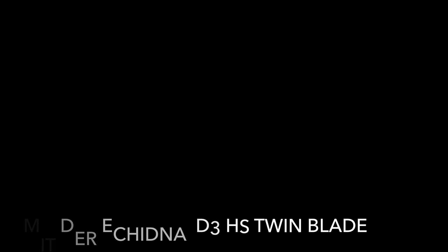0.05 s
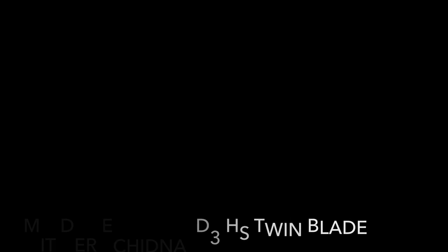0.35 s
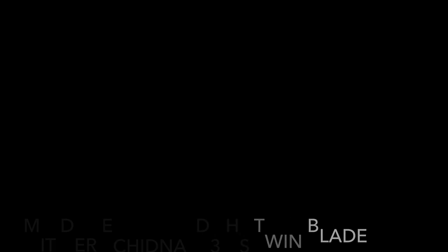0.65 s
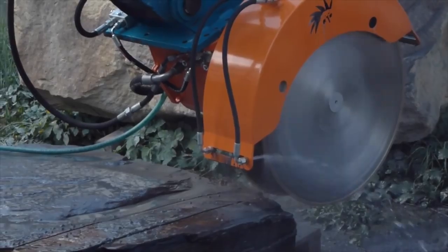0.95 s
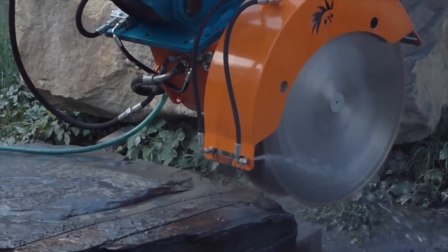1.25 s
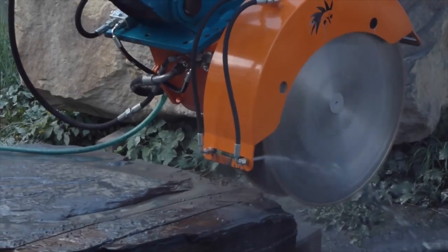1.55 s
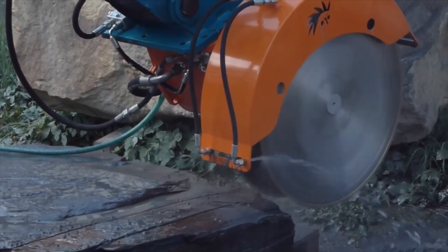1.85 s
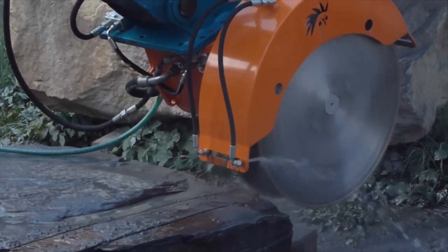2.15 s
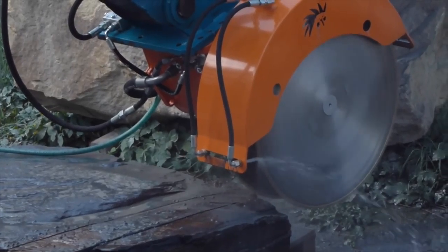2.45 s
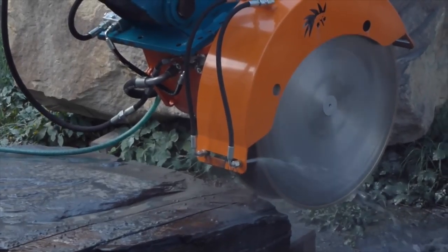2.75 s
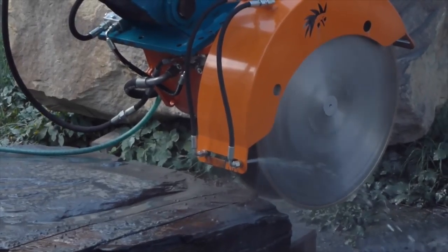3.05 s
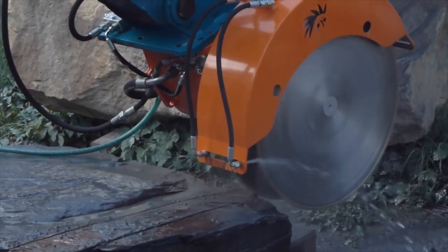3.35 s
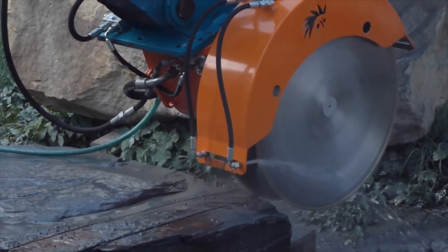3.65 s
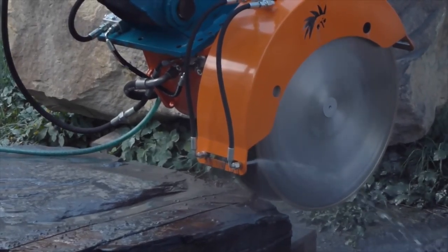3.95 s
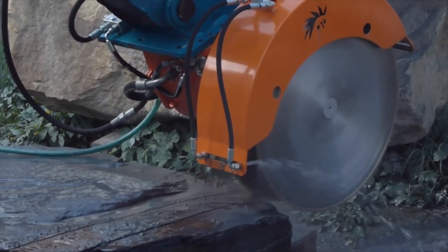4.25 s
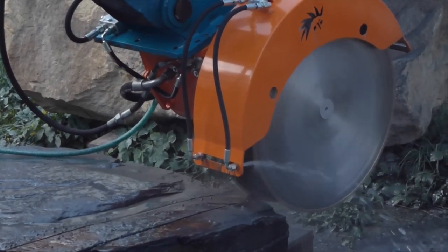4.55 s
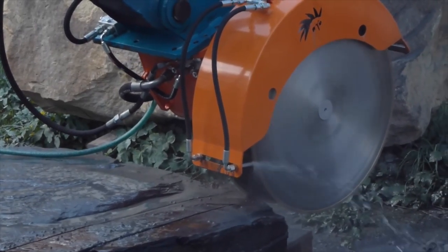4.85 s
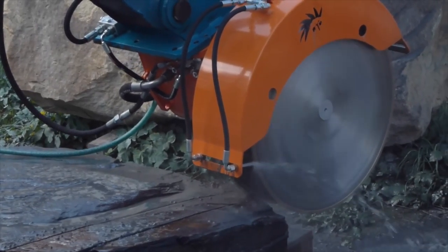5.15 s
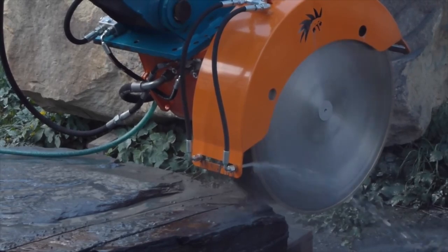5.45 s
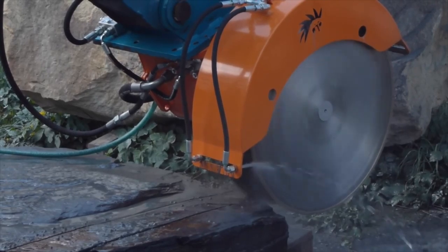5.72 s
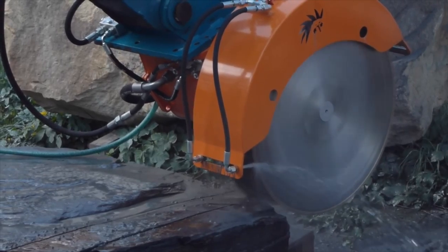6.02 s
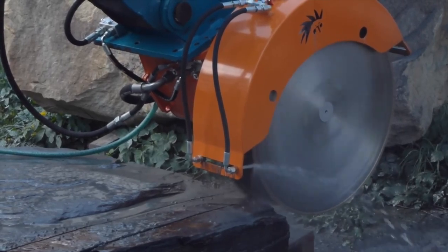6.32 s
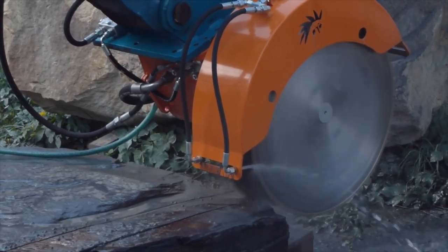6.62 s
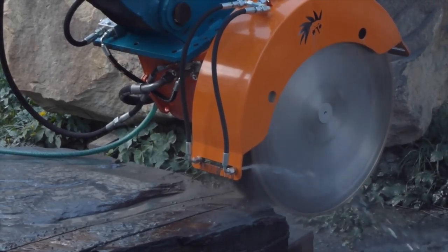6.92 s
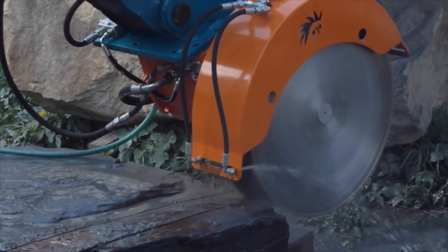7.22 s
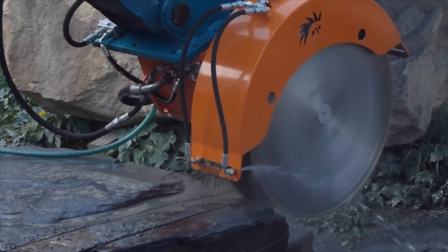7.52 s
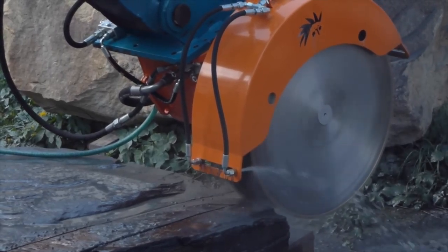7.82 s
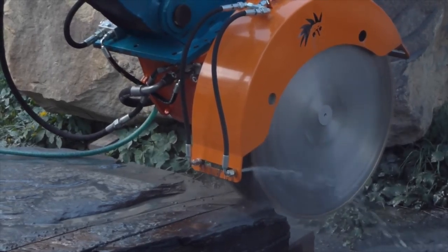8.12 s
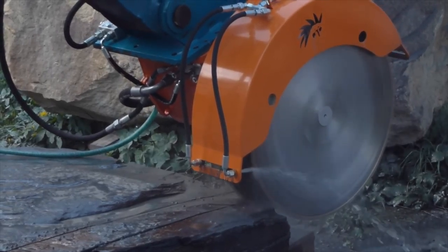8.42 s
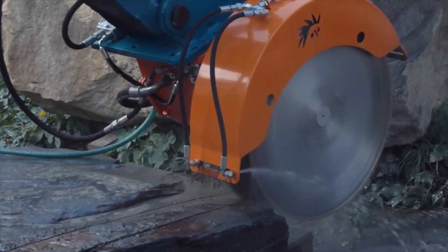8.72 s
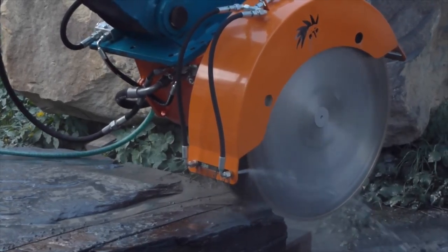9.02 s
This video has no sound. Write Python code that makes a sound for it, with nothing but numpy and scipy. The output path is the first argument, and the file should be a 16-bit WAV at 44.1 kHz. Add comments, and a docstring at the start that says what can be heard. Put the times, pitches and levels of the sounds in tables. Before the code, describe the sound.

A rock saw grinds into stone, its steel blade rasping, ringing and squealing over a droning diesel engine and hissing water spray.

```python
"""Rock saw biting into stone

A hydraulic saw on an excavator fades in, outdoors. Its big steel blade sinks into a slab: grit rasps
and sets the disc ringing, a little harder once a turn, and the kerf walls make it squeal and chatter.
Behind it the diesel, pump and fan drone at a steady speed. Cooling water sprays off the rim, and a
breeze brushes the microphone."""
import sys
import numpy as np
from scipy import signal
from scipy.fft import rfft, irfft
from scipy.io import wavfile
from scipy.ndimage import uniform_filter1d

SR = 44100
rng = np.random.default_rng(int(sys.argv[2]) if len(sys.argv) > 2 else 0)


def master_out(mix):
    """Clip the mix to full scale and print it as 16-bit PCM to the path in sys.argv[1]."""
    frames = np.transpose(np.atleast_2d(mix))
    ceiling = np.clip(frames, -1, 1)
    pcm = np.round(ceiling * 32767).astype(np.int16)
    wavfile.write(sys.argv[1], SR, pcm)


N = 409248
T = np.arange(N) / SR
FREQS = np.arange(N // 2 + 1) * SR / N
SEATED_S, FULL_DEPTH_S = 3.126, 6.5  # the blade seats in the stone, then reaches full depth

# The steel disc's strongest modes. Each row: pitch in Hz, width in Hz, base level in dB.
BLADE_MODES = [ (953, 16, -52.5), (1184, 36, -47), (1442, 6, -53.5), (1540, 20, -54), (1708, 12, -51.5),
               (1986, 6, -49.5), (2056, 10, -55), (2266, 5, -52.5), (2305, 16, -53.5), (2540, 6, -49.5),
               (2628, 16, -54), (2783, 8, -48), (2955, 9, -53), (3105, 14, -54), (3321, 18, -45),
               (3461, 14, -51.5), (3577, 18, -48), (3710, 12, -53), (3773, 14, -50.5), (3850, 10, -52.5),
               (3940, 16, -53), (4005, 11, -50.5), (4100, 36, -45), (4365, 18, -53), (4535, 22, -49),
               (4680, 12, -47.5), (4855, 12, -48.5), (5038, 50, -52), (5180, 16, -55), (5495, 20, -54),
               (5615, 16, -56), (5690, 20, -56), (5950, 70, -53), (6730, 30, -56), (7060, 60, -54),
               (7184, 8, -54), (7816, 20, -57.5), (7961, 40, -57.5), (8060, 30, -58), (9159, 12, -58.5),
               (9366, 25, -60), (9786, 13, -57.5), (9969, 20, -59), (12720, 140, -60), (13870, 130, -60)]


def saw(load_db, feed_db_per_s=16, brighten_db_per_s=0.5652, rasp_db=-35, chip_hz=3000):
    """Diamond segments crush the stone: a dry rasp plus ringing steel, brighter as the cut goes on."""
    # Stone crushed at the rim. Each row: frequency in Hz, relative level in dB.
    rasp_spectrum = [(200, -13.5), (600, 4.5), (900, 0), (1080, -7), (1300, 1.5), (2200, 1), (2850, 2.5),
                     (3220, -2.5), (3700, 0), (4250, -2), (4950, 1.5), (5350, -4), (5900, -6.5), (9000, -9),
                     (15500, -17.5)]
    # rim pressure climbs until the blade is seated, and leans with the engine's load
    pressure_db = 0.68 * load_db - feed_db_per_s * np.maximum(SEATED_S - T, 0)
    bright_db = brighten_db_per_s * (T - SEATED_S) - 0.5
    contact = rim_contact(pressure_db)
    grit = grains(per_s=18000)
    coarse, chips = split(level(colour(grit, rasp_spectrum), rasp_db), chip_hz)
    # the finest chips follow the contact most closely
    fine = chips * contact + blade_shimmer(grit * contact)
    steel = blade_ring(grit, contact, bright_db) + screech(grit, contact)
    return undb(pressure_db) * (coarse * contact ** 0.12 + fine * undb(bright_db) + steel)


def rim_contact(pressure_db, runout_db=1.1, snag=0.47, bite_rise_s=0.01, bite_s=0.023):
    """The disc is not quite true: once a turn it digs in fast and lets go slowly. Hard spots add bites."""
    # Blade speed, sagging as it bites. Each row: time in seconds, turns per second.
    spin = [(0, 10.75), (3.4, 10.75), (3.9, 10.5), (6, 10.5), (6.5, 10.45)]
    # The rim catches on hard spots. Each row: start in seconds, extra contact in dB.
    bites = [(2.353, 7), (2.451, 4), (2.541, 4), (2.637, 5), (2.733, 4), (2.825, 1.5), (2.92, 5),
             (3.143, 4), (3.266, 2.5), (3.402, 3.5), (3.77, 4), (3.84, 0.5), (4.02, 0), (4.135, 3),
             (4.225, 3.5), (4.615, 2), (4.775, 1.5), (5.195, 3.5), (6.235, 3), (8.92, 3), (9.11, 3)]
    angle = 2 * np.pi * (np.cumsum(in_time(spin)) / SR + 0.8)
    scrape = np.sin(angle) + snag * np.sin(2 * angle) + snag ** 2 * np.sin(3 * angle)
    # under light pressure only the high side of the rim touches
    graze = 0.25 * np.clip(-pressure_db, 0, 10)
    turn_scatter = 1 + 0.18 * walk(spin[0][1])
    contact_db = runout_db * (1.5 + graze) * turn_scatter * scrape + walk(30)
    for start, bite_db in bites:
        age = np.maximum(T - start, 0)
        rise = np.minimum(age / bite_rise_s, 1)
        contact_db += bite_db * rise / (1 + (age / bite_s) ** 4)
    return undb(contact_db)


def blade_ring(grit, contact, bright_db, high_hz=5000):
    """Grit rings the disc, louder while the rim presses; every mode wavers on its own."""
    # Modes that wake or die away with depth.
    # Each row: rough pitch in Hz, gain in dB as the blade seats, gain in dB at full depth.
    waking_modes = [(2783, 4.5, 0), (3461, 6, 1.5), (3577, -9, 5), (4005, 1, -0.5), (4100, -3.5, 0),
                    (4680, -0.5, -8), (4855, -2, 0), (7184, -6, 3), (7816, 0, 7), (8020, 10.5, -20)]
    # the highest modes are rung by the finest chips and come and go the most
    gains_db = [3 * walk(2.9) - 2 + bright_db if hz > high_hz else 1.04 * walk(3.04)
                for hz, _, _ in BLADE_MODES]
    for hz, shallow_db, deep_db in waking_modes:
        gains_db[mode_at(hz)] += shallow_db + (deep_db - shallow_db) * kerf_depth()
    drive = grit * contact
    rings = 0
    for (hz, width_hz, db), gain_db in zip(BLADE_MODES, gains_db):
        ring = steady_ring(resonate(drive, hz, width_hz))
        rings += level(ring, db + 0.23) * undb(gain_db)
    return rings * contact ** 0.25


def steady_ring(ring):
    """Evens out a mode's loudness so it rings steadily, without sudden swells."""
    power = uniform_filter1d(ring ** 2, size=3000)
    return ring / np.sqrt(power + power.mean())


def blade_shimmer(grit, t60_s=0.074, shimmer_db=-41, shift_db=2.5, count=190):
    """The disc's crowded high modes ring as one metallic sheen; five groups drift in and out."""
    # The colour of the sheen. Each row: frequency in Hz, relative level in dB.
    sheen_spectrum = [(2400, -18), (3200, -24), (3800, 6), (5050, -7), (5350, -8), (5650, -0.5),
                      (7400, -0.5), (8400, -11), (10400, -4.5), (11300, -10), (12700, -8), (14000, -16),
                      (15500, -28)]
    t = T[:SR // 4]
    pitches = np.linspace(2400, 14500, count) + rng.uniform(-25, 25, count)
    sizes = undb(1.3 * rng.standard_normal(count))
    phases = 2 * np.pi * rng.random(count)
    rings = sizes[:, None] * np.sin(2 * np.pi * pitches[:, None] * t + phases[:, None])
    rings *= np.exp(-np.log(1000) * t / t60_s)
    groups = [rings[k::5].sum(axis=0) for k in range(5)]
    sheen = sum(signal.oaconvolve(grit, group)[:N] * undb(shift_db * walk(6)) for group in groups)
    return level(colour(sheen, sheen_spectrum), shimmer_db)


def screech(grit, contact, shallow_db=-46, damping_db=-11):
    """In a shallow kerf the rim's high side screeches once a turn; deeper in, the walls damp it."""
    scrape = np.minimum(contact, 2) ** 2.2
    ring = resonate(grit * scrape, hz=4620, width_hz=260)
    return level(ring, shallow_db) * undb(damping_db * kerf_depth())


def squeals(jitter_hz=14, rough_db=3):
    """The disc sticks and slips against the kerf wall, and single modes sing out."""
    # Each row: peak time in seconds, pitch in Hz, half length in seconds, level in dB.
    rubs = [(2.85, 3321, .05, -40), (3.02, 2783, 0.045, -44), (3.25, 2783, 0.064, -42),
            (3.86, 3321, 0.079, -35), (3.87, 2540, 0.12, -39), (4.034, 4855, .03, -39),
            (4.245, 3321, 0.096, -38), (4.26, 4680, .06, -45), (4.625, 4100, .07, -37),
            (4.635, 2783, .055, -37), (4.972, 1986, 0.12, -40), (5.035, 2783, 0.032, -37),
            (5.27, 1986, 0.075, -40), (5.317, 3321, .05, -35), (5.46, 4855, .03, -40),
            (5.61, 3321, 0.056, -40), (5.67, 2783, .045, -37), (5.84, 1986, 0.059, -44),
            (6.103, 2783, 0.067, -35.5), (6.65, 2783, 0.15, -42), (6.76, 3321, .06, -43),
            (7.057, 2783, 0.034, -37), (7.17, 1986, 0.21, -43), (8.16, 3321, .03, -41),
            (8.367, 4855, .06, -36), (8.503, 1986, 0.11, -41), (8.95, 4855, .04, -41)]
    singing = 0
    for mode, (hz, _, _) in enumerate(BLADE_MODES):
        swells = [undb(db) * swell(peak_s, half_s, half_s)
                  for peak_s, near_hz, half_s, db in rubs if mode_at(near_hz) == mode]
        if swells:
            singing += sum(swells) * tone(hz + jitter_hz * walk(160), rough_db * walk(80))
    return singing


def chatter(jitter_hz=14, rough_db=3.5, stutter_db=-51):
    """Deep in the cut, stick and slip shakes the disc in short, rough bursts."""
    # Each row: peak time in seconds, level in dB.
    burst_peaks = [(4.77, -35), (5.2, -44), (5.45, -44), (5.75, -35), (6.25, -34), (6.68, -49), (6.76, -40),
                   (6.96, -38), (7.09, -50), (7.38, -43), (7.47, -44), (7.57, -39), (7.66, -37.5),
                   (7.76, -52), (7.86, -57), (8.07, -39), (8.37, -51), (8.57, -40), (8.76, -53),
                   (8.85, -51), (8.97, -45), (9.13, -43)]
    # Neighbouring modes that chatter together. Each row: pitch in Hz, relative level in dB.
    chatter_modes = [(3461, -10), (3577, 0), (4100, -8)]
    bursts = sum(undb(db) * swell(peak_s, rise_s=0.011, fall_s=0.032) for peak_s, db in burst_peaks)
    # between the bursts a fainter stutter goes on, growing with depth
    stutter = kerf_depth() * undb(stutter_db + 4 * walk(28))
    ring = sum(tone(hz + jitter_hz * walk(200), db + rough_db * walk(110)) for hz, db in chatter_modes)
    return (bursts + stutter) * ring


def engine(cycle_hz=19.322, drift=0.00033, knock_db=2, knock_hz=700, roar_db=-31.5):
    """The diesel and the pump it drives: a throbbing drone, and a roar whose lows surge at each firing."""
    # Engine and pump tones. Each row: multiple of the four-stroke cycle rate, base level in dB.
    drone_orders = [(4, -56), (9, -54), (11, -55), (12, -56), (14, -48), (15, -55), (17, -49), (19, -48),
                    (21, -49), (24, -48), (25, -49), (28, -43.5), (29, -45.5), (30, -47), (31, -53),
                    (34, -52), (36, -57), (37, -53), (38, -56), (39, -51), (44, -55), (48, -57), (64, -57)]
    # The machine's roar. Each row: frequency in Hz, relative level in dB.
    roar_spectrum = [(18, -65), (30, -65), (65, -18), (102, -16), (190, -8), (374, -3), (450, -4.5),
                     (520, -2.5), (600, -6), (774, -10.5), (928, -8.5), (1080, -12), (1400, -10),
                     (3200, -15), (3780, -16.5), (5350, -22.5), (6200, -24.5), (15000, -38.5)]
    # Combustion knock in firing order. Each entry: one cylinder's relative strength in dB.
    cylinders_db = [-6, 2, -9, -18]
    cycles = np.cumsum(cycle_hz * (1 + drift * walk(1.95))) / SR
    drone = sum(order_tone(cycles, order, db) for order, db in drone_orders)
    pump = hydraulics(cycles)
    firing, since_firing = np.divmod(cycles * len(cylinders_db), 1)
    cylinder = firing.astype(int) % len(cylinders_db)
    knock = undb(cylinders_db)[cylinder] * np.exp(-since_firing / 0.3)
    surge = level(np.hypot(1, undb(knock_db) * knock), 0)
    low, high = split(level(colour(rng.standard_normal(N), roar_spectrum), roar_db), knock_hz)
    strength = undb(1.2 * walk(cycle_hz) - 1.76)  # no two cycles are equally strong
    return drone * strength + pump + low * surge + high


def hydraulics(cycles):
    """The pump's tone firms up at the end, and a faint whine swells once under load."""
    pump_db = -42.5 + 4.8 * swell(peak_s=9.03, rise_s=0.18, fall_s=0.18) + walk(9.4)
    whine_db = -54 + 13 * swell(peak_s=8.38, rise_s=0.43, fall_s=0.51)
    pump = order_tone(cycles, order=27, db=pump_db, jitter_rad=0.11 * walk(25))
    return pump + order_tone(cycles, order=35, db=whine_db)


def order_tone(cycles, order, db, jitter_rad=0):
    """One harmonic of the engine cycle; hoses and boom delay distant orders differently."""
    turns = order * cycles + 0.025 * order ** 2
    return np.sqrt(2) * undb(db) * np.sin(2 * np.pi * turns + jitter_rad)


def fan(hz=631.5, db=-48):
    """The cooling fan's blades add a soft, slightly wavering tone."""
    return tone(hz + 0.6 * walk(2.95), db + 2 * walk(4))


def water(spray_db=-51):
    """Droplets flung off the rim patter on the guard and the stone."""
    # The hiss of the spray. Each row: frequency in Hz, relative level in dB.
    spray_spectrum = [(800, -29), (3000, -11), (5350, 11), (6500, 9), (9000, -2), (15000, -30)]
    droplets = grains(per_s=2000, soften_db=3.5)
    return level(colour(droplets, spray_spectrum), spray_db) * undb(1.2 * walk(6))


def breeze(air_db=-73, gust_db=-44, flutter_db=2):
    """One gust builds and drops over light air: low buffeting, unrelated on the two sides."""
    # Wind on the microphone. Each row: frequency in Hz, relative level in dB.
    buffet_spectrum = [(15, -22), (35, -21), (60, -1), (110, -2.5), (250, -7), (800, -46)]
    sides = []
    for side_db in (0.5, -0.5):
        rumble = level(colour(rng.standard_normal(N), buffet_spectrum), side_db)
        sides.append(rumble * undb(flutter_db * walk(9.2)))
    gust = swell(peak_s=7.24, rise_s=1.44, fall_s=0.58)
    return np.array(sides) * (undb(air_db) + undb(gust_db) * gust)


def yard(x, scatter_s=0.016):
    """Rocks scatter a share back; the stereo pickup shifts the left's phase ahead, widening the sound."""
    # The stereo image. Each row: frequency in Hz, likeness of the sides from 0 to 1,
    # left phase lead in radians, left minus right in dB.
    stereo_image = [(50, 0.87, .05, 2), (250, 0.99, 0.17, 2), (550, 0.94, 0.59, 2), (1110, 0.73, 0.79, 4.5),
                    (1940, 0.97, 1.44, 3), (4230, 1, 1.16, 0), (7900, 0.57, 1.17, -0.4),
                    (14000, 0.22, .2, -1.5)]
    likeness, phase_lead, pan_db = in_frequency(stereo_image)
    side = np.array([[1], [-1]])
    paths = 1 + rng.random(500)
    delay_s = scatter_s * np.interp(FREQS, np.linspace(0, SR / 2, len(paths)), paths)
    scattered = np.exp(-2j * np.pi * np.cumsum(delay_s) * SR / N)
    spread = np.sqrt((1 + likeness) / 2) + side * np.sqrt((1 - likeness) / 2) * scattered
    pickup = np.exp(1j * side * phase_lead / 2) * undb(side * pan_db / 2)
    return irfft(rfft(x) * spread * pickup, N)


def kerf_depth():
    """Depth of the cut, from 0 when the blade seats to 1 at full depth."""
    return np.clip((T - SEATED_S) / (FULL_DEPTH_S - SEATED_S), 0, 1)


def mode_at(hz):
    """Row of the disc's mode nearest to a frequency."""
    return np.argmin([abs(row[0] - hz) for row in BLADE_MODES])


def grains(per_s, soften_db=0):
    """Tiny random impacts at unit rms; soften_db turns each down by a random amount."""
    softening = undb(-soften_db * np.minimum(rng.exponential(size=N), 4))
    sizes = softening * rng.standard_normal(N)
    return level(sizes * (rng.random(N) < per_s / SR), 0)


def tone(hz, db):
    """A sine that follows a pitch curve, at an rms level."""
    return np.sqrt(2) * undb(db) * np.sin(2 * np.pi * np.cumsum(hz) / SR)


def swell(peak_s, rise_s, fall_s):
    """A bell-shaped envelope that reaches 1 at its peak."""
    return np.exp(-((T - peak_s) / np.where(T < peak_s, rise_s, fall_s)) ** 2)


def walk(rate_hz):
    """A random wobble with a spread near 1."""
    knots = rng.standard_normal(2048)
    return np.interp(T * rate_hz, np.arange(len(knots)), knots)


def resonate(x, hz, width_hz):
    """A steep-sided resonance: two equal stages in series."""
    radius = np.exp(-np.pi * width_hz / np.sqrt(np.sqrt(2) - 1) / SR)
    stage = [1, 0, -1, 1, -2 * radius * np.cos(2 * np.pi * hz / SR), radius ** 2]
    return signal.sosfilt([stage, stage], x)


def split(x, hz):
    """The parts of a sound below and above a frequency."""
    low = irfft(rfft(x) / (1 + (FREQS / hz) ** 4), N)
    return low, x - low


def colour(x, table):
    """Filter by a spectrum of Hz and dB pairs."""
    return irfft(rfft(x) * undb(in_frequency(table)[0]), N)


def in_frequency(table):
    """The columns of a spectrum table at every frequency."""
    hz, *columns = np.transpose(table)
    return [np.interp(np.log(FREQS + 1), np.log(hz), column) for column in columns]


def in_time(table):
    """A curve of time and value pairs at every sample."""
    return np.interp(T, *np.transpose(table))


def level(x, db):
    """Scale to an rms level."""
    return x * undb(db) / np.sqrt(np.mean(x ** 2))


def undb(db):
    """Decibels to gain."""
    return 10 ** (np.asarray(db) / 20)


def scene():
    """Machine, cut and water in a rocky yard, with a breeze on top."""
    # The engine's effort. Each row: time in seconds, load in dB.
    effort = [(2.5, 0.05), (3.4, 0), (4.3, 1.1), (4.7, 2.5), (6.3, 0.5), (6.8, 1.0), (7.2, -0.5),
              (8.4, 1.5), (9.2, 0.5)]
    load_db = in_time(effort)
    machine = engine() * undb(load_db) + fan()
    cut = saw(load_db) + squeals() + chatter()
    return yard(machine + cut + water()) + breeze()


def record(dry, fade_start_s=0.9, fade_s=2.11, top_hz=15750):
    """A slow fade up from silence, and a steep top cut."""
    fade = np.sin(np.pi / 2 * np.clip((T - fade_start_s) / fade_s, 0, 1))
    top_cut = signal.ellip(10, 0.1, 80, top_hz, fs=SR, output="sos")
    return signal.sosfilt(top_cut, dry * fade)


dry = scene()
out = record(dry)
master_out(out)
```